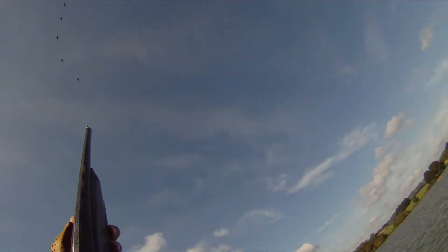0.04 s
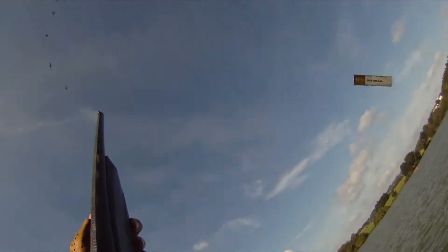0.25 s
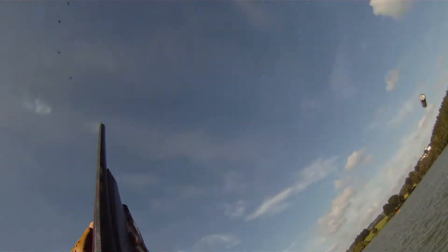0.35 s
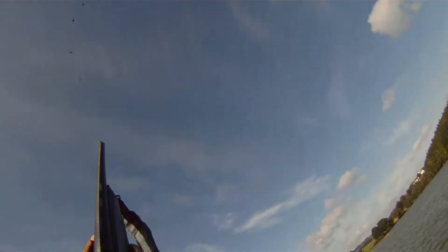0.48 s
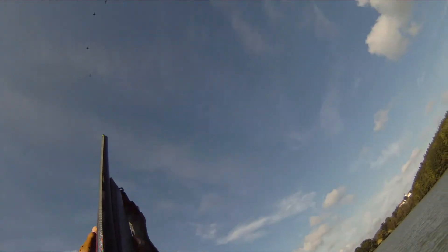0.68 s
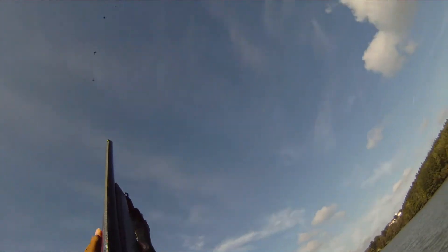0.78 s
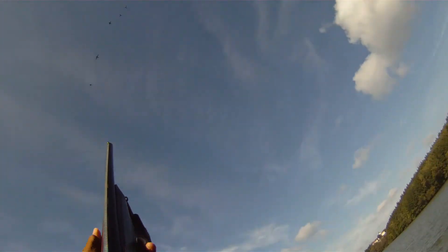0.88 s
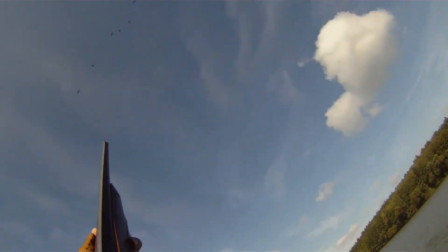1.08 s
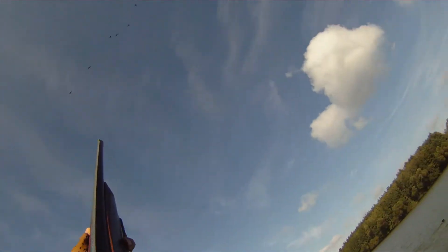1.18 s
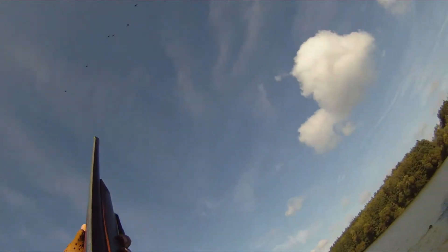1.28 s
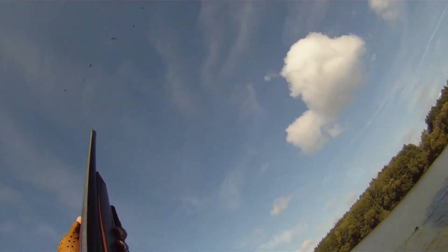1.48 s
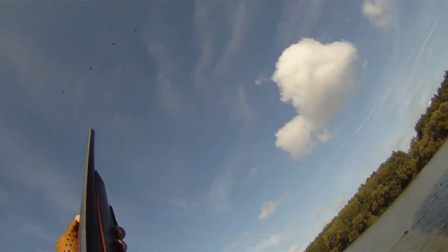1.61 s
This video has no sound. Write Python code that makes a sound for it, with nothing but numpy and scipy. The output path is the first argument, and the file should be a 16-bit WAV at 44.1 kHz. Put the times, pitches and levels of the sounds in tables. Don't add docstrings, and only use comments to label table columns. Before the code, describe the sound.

A single distorted gunshot at arm's length, followed at once by bright mechanical clatter and a hollow echo over open water, fading under dull camera bumps, small plastic clicks and faint air hiss.

```python
import sys
import numpy as np
from scipy import signal
from scipy.fft import rfft, irfft
from scipy.io import wavfile
from scipy.ndimage import uniform_filter1d

SR = 44100
rng = np.random.default_rng(int(sys.argv[2]) if len(sys.argv) > 2 else 0)


def store_pcm(level_fs):
    pcm = np.round(np.clip(level_fs, -1, 1) * 32767).astype(np.int16)
    wavfile.write(sys.argv[1], SR, np.atleast_2d(pcm).T)


def makeup_ratio(level_db):
    decades = np.asarray(level_db, float) / 20
    return 10 ** decades


N = 72765

# (time [s], level [dB], pitch [Hz], length [cycles])
PUSHES = [(0.2219, -5.5, 660, 1.7), (.225, 3, 910, 1.8), (0.2335, -10, 884, 0.82), (0.2337, -7, 830, 1.02),
          (.237, -17, 664, 8.1), (0.3749, -19.5, 910, 2), (.4555, -14.5, 724, 3.8), (.515, -14.5, 894, 3.2),
          (0.5417, -23.5, 3530, 6.7), (0.4547, -26, 330, 2.2), (0.7687, -34, 300, 1.5),
          (.816, -32, 330, 1.6), (.865, -31.5, 330, 1.5), (.964, -51, 8730, 70), (.875, -32, 330, 1.1),
          (0.887, -34, 350, 1.1), (1.305, -32.5, 300, 1.47), (0.543, -21, 900, 0.98),
          (1.2037, -29, 490, 1.1), (1.2223, -29, 700, 1.3), (1.231, -31, 706, 2.15), (1.271, -41, 800, 2.2),
          (1.3772, -33.5, 450, 1.38), (1.3802, -34, 450, 0.92), (1.362, -40, 598, 1),
          (1.398, -38, 913, 1.2), (1.4017, -30.5, 406, 1.3), (1.42, -46, 496, 1.1),
          (1.4331, -19.5, 553, 0.97), (1.4428, -21.5, 495, 0.92), (1.477, -29.5, 450, .9),
          (1.6192, -32.5, 417, 1.02), (1.6223, -27, 445, 1.3), (1.6245, -34.5, 418, 1.1),
          (1.6455, -34.5, 520, 2.3)]
# (time [s], level [dB], pitch [Hz], length [cycles])
PULLS = [
    (.2208, -4, 710, 0.56),
    (.541, -10, 740, 1.6),
    (1.2071, -25, 420, 0.87),
    (1.2422, -26, 478, 0.7),
    (1.3226, -20.5, 706, 3),
    (1.485, -29, 647, 1.94),
]
# (time [s], length [s], level [dB], colour centre [Hz])
CLATTER = [(0.21, 0.0036, -37, 5820), (0.217, 0.0036, 6.5, 5600), (0.2226, 0.0025, 6.5, 5340),
           (0.2256, 0.0017, 2, 9100), (0.2347, 0.0053, -13.5, 9000), (0.2393, 0.003, -2, 9600),
           (0.243, 0.003, -5, 12500), (0.2461, 0.0012, -8.5, 11000), (0.255, 0.0016, -6, 9600),
           (0.2615, 0.0048, -16, 13000), (0.272, 0.01, -17.5, 3870), (0.276, 0.015, -17, 12200),
           (0.289, 0.0026, -16, 9000), (0.2927, 0.0066, -13.5, 7100), (0.335, .005, -21.5, 11000),
           (0.346, 0.0014, -14, 7920), (0.351, 0.00086, -11, 8114), (0.353, 0.0024, -15.5, 13000),
           (0.3691, 0.0033, -12.5, 12000), (0.382, 0.0028, -7, 4500), (0.3823, 0.0034, -5.5, 8000),
           (0.378, 0.002, 0.5, 12300), (0.3801, 0.006, -4, 13000), (0.3871, 0.0048, -1.5, 12800),
           (0.391, .003, -12, 13100), (0.394, .003, -20, 12100), (0.4, 0.001, -17.5, 8400)]
# (frequency [Hz], level [dB])
METAL_BODY = [(180, -43.5), (300, -19.5), (700, -8), (2500, -1), (5600, -0.5), (8000, -3), (12500, -2.5),
              (15500, 1)]
# (frequency [Hz], level [dB])
RATTLE_COLOUR = [(880, -29.5), (1700, 1), (2440, -2.5), (5290, -1.5), (9000, -4), (12400, -10),
                 (15300, -14.5)]
# (frequency [Hz], level [dB])
ECHO_COLOUR = [(100, -37.5), (430, -10.5), (920, -0.5), (1300, -6.5), (1900, -6.5), (2400, -16.5),
               (4800, -13.5), (6000, -23)]
# (frequency [Hz], time [s])
ECHO_T60 = [(200, 1.96), (700, 1.363), (1500, 1.164), (3000, 1.02), (5000, 0.98), (7000, 0.98),
            (12000, 0.48)]
# (time [s], level [dB])
SHORE = [(.222, -19.5), (.243, -27), (.262, -33), (.283, -20.5), (.31, -16), (.41, -16), (.52, -17),
         (.6, -19.5), (.75, -17.5), (1.0, -9.5), (1.6, -12)]
# (time [s], level [dB], quickness [Hz])
HEAVES = [(0.2347, -26, 120), (0.4571, -27, 168), (0.5393, -25, 300), (0.7674, -26.5, 102),
          (.8151, -34.5, 90.5), (0.8633, -39, 130), (0.876, -25, 127), (0.8868, -24.5, 160),
          (0.974, -37, 107.2), (1.1882, -37, 102.3), (1.2031, -33, 111.5), (1.2361, -34, 70),
          (1.2855, -34, 44.8), (1.303, -36, 140), (1.33, -33, 145), (1.358, -36, 151), (1.364, -34, 90),
          (1.3965, -27, 131), (1.4064, -34, 59.8), (1.4762, -30, 120), (1.4893, -38, 58), (1.509, -29, 70),
          (1.581, -33, 60), (1.6053, -26, 109), (1.646, -32.5, 60.5)]
# (time [s], level [dB], quickness [Hz])
DENTS = [(0.2207, -29, 163), (0.2265, -23.5, 80), (0.242, -29, 130), (0.4588, -32, 140), (0.5426, -35, 150),
         (0.771, -30, 90), (0.8706, -32, 129), (0.8742, -24, 140), (0.8843, -39, 90), (0.93, -41, 60),
         (1.04, -36, 82), (1.123, -41.5, 58), (1.2184, -29.5, 90), (1.2273, -27, 120.4),
         (1.2419, -34, 108.9), (1.2954, -34, 51), (1.3079, -35, 120), (1.3236, -26, 173), (1.355, -43, 82),
         (1.3703, -42.5, 110), (1.3929, -31.5, 89.7), (1.4027, -33, 118.7), (1.4168, -54, 100.4),
         (1.431, -24.5, 170), (1.4623, -38.5, 97), (1.472, -41, 118.8), (1.4819, -29, 80),
         (1.526, -28, 110), (1.6163, -34.5, 60.1)]
# (time [s], length [s], level [dB], colour centre [Hz])
TICKS = [(0.059, 0.0032, -52, 7900), (0.169, .004, -58, 9000), (.497, .002, -41, 8500),
         (.5395, 0.0033, -28.5, 3520), (.54, 0.0042, -36, 7340), (0.749, 0.0031, -43, 4150),
         (0.766, 0.003, -43.5, 3770), (.756, .002, -51.5, 11000), (0.828, 0.0026, -58.5, 12940),
         (0.86, .004, -53, 11200), (0.874, .002, -57, 10860), (0.901, 0.026, -49, 8140),
         (0.956, 0.026, -49.5, 9840), (1.16, 0.004, -45.5, 6560), (1.403, .004, -52.5, 6040),
         (1.633, .004, -57, 11030), (1.185, 0.025, -57.5, 9700), (1.138, 0.0042, -52, 2120),
         (0.044, 0.0037, -52.5, 3260), (1.018, .005, -54.5, 8000), (1.188, 0.056, -57, 2780),
         (1.245, 0.0019, -50, 11900), (1.2685, .003, -54, 4480), (1.544, 0.0057, -52.5, 4950)]
# (time [s], level [dB], colour centre [Hz])
CRACKS = [
    (.0165, -47, 13500),
    (.0845, -47, 9000),
    (.089, -52, 14000),
    (.156, -50, 9000),
    (.5402, -26, 4200),
    (1.1597, -42, 7000),
    (1.1612, -35, 6100),
    (1.186, -43, 12000),
    (1.289, -43, 6000),
    (1.2912, -40, 4000),
]
# (frequency [Hz], level [dB])
WIND_COLOUR = [(12, -35), (20, 5), (87, 5.5), (257, -3), (387, -1.5), (809, -18.5), (1200, -46),
               (1560, -67.5), (2640, -120)]
# (time [s], level [dB])
GUSTS = [(0.0, -60), (0.182, -54.5), (0.228, -65), (0.26, -49), (0.44, -63), (0.458, -47), (0.482, -56),
         (0.738, -57.5), (0.766, -45.5), (0.844, -49), (0.868, -44), (0.996, -59), (1.16, -49), (1.22, -47),
         (1.27, -52), (1.35, -45), (1.548, -50), (1.65, -50)]
# (frequency [Hz], level [dB])
AIR_COLOUR = [(60, -16.5), (340, -4), (950, -2.5), (1400, -13.5), (1900, -9.5), (2400, -21), (5200, -23.5),
              (15300, -35)]


def evened(x):
    return x / np.sqrt(np.mean(x ** 2) + 1e-20)


def read(points, hz):
    f, value = np.transpose(points)
    return np.interp(np.log(hz + 1), np.log(f + 1), value)


def curve(points, t):
    return np.interp(t, *np.transpose(points))


def add(mix, s, sound):
    part = mix[round(s * SR):][:len(sound)]
    part += sound[:len(part)]


def add_centred(mix, s, sound):
    add(mix, s - 2048 / SR, sound)


def coloured(shape, count):
    hz = np.fft.rfftfreq(count, 1 / SR)
    return evened(irfft(rfft(rng.standard_normal(count)) * makeup_ratio(read(shape, hz)), count))


def lumps(ms, depth_db):
    width = max(int(ms * SR / 1000), 2)
    smooth = uniform_filter1d(uniform_filter1d(rng.standard_normal(N), width), width)
    return makeup_ratio(depth_db * evened(smooth))


def blow(db, hz, cycles):
    u = np.arange(-2048, 2048) / SR * hz
    push = np.exp(-(u / (0.47 * cycles)) ** 2) * np.cos(2 * np.pi * u + 0.5)
    snap = np.exp(-(u / (0.26 * cycles)) ** 2) * np.cos(2 * np.pi * 2.04 * u + 0.21)
    return makeup_ratio(db) * (push + makeup_ratio(-11.5) * snap)


def muzzle_blows():
    mix = np.zeros(N)
    for s, *row in PUSHES:
        add_centred(mix, s, blow(*row))
    for s, *row in PULLS:
        add_centred(mix, s, -blow(*row))
    return mix


def burst(length, db, centre_hz, body_db, width, t60):
    t, hz = np.arange(4096) / SR, np.fft.rfftfreq(4096, 1 / SR)
    body = makeup_ratio(read(METAL_BODY, hz) + body_db)
    colour = np.exp(-0.5 * (np.log((hz + 1) / centre_hz) / width) ** 2)
    noise = evened(irfft(rfft(rng.standard_normal(4096)) * (body + colour)))
    rise = np.minimum(t / 0.0003, 1)
    return noise * rise * makeup_ratio(db - 60 * np.maximum(t - length, 0) / t60)


def action_clatter():
    mix = np.zeros(N)
    for s, *row in CLATTER:
        add(mix, s, burst(*row, body_db=-4, width=0.16, t60=0.007))
    return mix


def rattle():
    t = np.arange(N) / SR
    start, end, t60 = 0.229, 0.39, 0.16
    travel = np.clip((t - start) / (end - start), 0, 1)
    db = -21 - 1.5 * travel - 60 * np.maximum(t - end, 0) / t60
    return coloured(RATTLE_COLOUR, N) * lumps(0.57, 2.5) * makeup_ratio(db) * (t > start)


def echo_wash(fade_start):
    frames, hz = N // 64 + 5, np.fft.rfftfreq(256, 1 / SR)
    t = np.arange(frames) * 64 / SR
    a, b = rng.standard_normal((frames, 129, 2)).T
    steady = (a + 1j * b) * makeup_ratio(read(ECHO_COLOUR, hz)[:, None])
    loss_db = -60 * np.maximum(t - fade_start, 0) / read(ECHO_T60, hz)[:, None]
    undamped = signal.istft(steady, nperseg=256, noverlap=192)[1][:N]
    wash = signal.istft(steady * makeup_ratio(loss_db), nperseg=256, noverlap=192)[1][:N]
    return wash / np.std(undamped)


def housing_grains(fade_start):
    hz, width_hz, grains_per_s, t60 = 930, 260, 200, 0.97
    t, u = np.arange(N) / SR, np.arange(600) / SR
    draw = rng.random((N, 2))
    clicks = (draw[:, 0] < grains_per_s / SR) * (2 * draw[:, 1] - 1)
    ring = u * np.exp(-np.pi * width_hz * u) * np.sin(2 * np.pi * hz * u)
    fade = makeup_ratio(-4 - 60 * np.maximum(t - fade_start, 0) / t60)
    return evened(signal.oaconvolve(clicks, ring)[:N]) * fade


def echo():
    t, fade_start = np.arange(N) / SR, 0.31
    returns = echo_wash(fade_start) * lumps(12.0, 1.5) + housing_grains(fade_start)
    return returns * makeup_ratio(curve(SHORE, t)) * (t > SHORE[0][0])


def bump(db, hz):
    u = abs(np.arange(-2048, 2048) / SR * hz)
    swing = np.exp(-np.log(2) * (4.5 * u) ** 1.2)
    rebound = 0.4 * np.exp(-11 * (u / 2.2) ** 2)
    return makeup_ratio(db + 2.5) * (swing - rebound)


def housing_bumps():
    mix = np.zeros(N)
    for s, *row in HEAVES:
        add_centred(mix, s, bump(*row))
    for s, *row in DENTS:
        add_centred(mix, s, -bump(*row))
    return mix


def hand_ticks():
    mix = np.zeros(N)
    for s, length, *row in TICKS:
        add(mix, s, burst(0.21 * length, *row, body_db=-22, width=0.24, t60=5.5 * length))
    return mix


def cracks():
    mix = np.zeros(N)
    for s, *row in CRACKS:
        add(mix, s, burst(0.0004, *row, body_db=-10, width=0.3, t60=0.004))
    return mix


def crackle():
    draw = rng.random((N, 2))
    hits = (draw[:, 0] < 45 / SR) * makeup_ratio(8.9 * draw[:, 1])
    fade = makeup_ratio(-60 * np.arange(800) / SR / 0.014)
    shape = signal.oaconvolve(hits, fade)[:N]
    return makeup_ratio(-72) * shape * coloured([(2500, -31.5), (5000, -0.5), (15000, -5.0)], N)


def wind():
    strength = makeup_ratio(curve(GUSTS, np.arange(N) / SR) + 2.5)
    return coloured(WIND_COLOUR + [(4000, -61)], N) * lumps(8.0, 1.6) * strength


def still_air():
    return makeup_ratio(-46.5 - 2.5) * coloured(AIR_COLOUR, N) * lumps(30.0, 0.94)


def scene():
    shot = muzzle_blows() + action_clatter() + rattle() + echo()
    handling = housing_bumps() + hand_ticks() + cracks() + crackle()
    mix = shot + handling + wind() + still_air()
    return mix[None]


def roll_off(x):
    return signal.sosfilt(signal.butter(12, 16040, fs=SR, output="sos"), x)


def record(dry):
    overload, edge_hz = 0.91, 15300
    edge = signal.firwin(255, edge_hz, window=("kaiser", 7), fs=SR)[None]
    limited = signal.oaconvolve(np.clip(dry, -overload, overload), edge, "same")
    return roll_off(np.clip(limited, -1, 1))


dry = scene()
out = record(dry)
store_pcm(out)
```